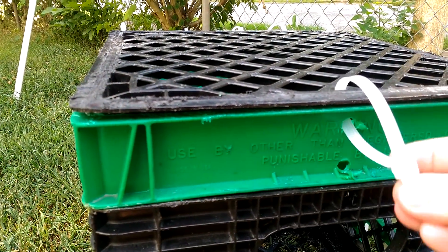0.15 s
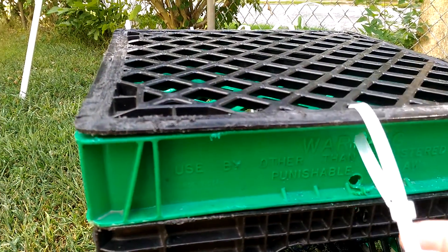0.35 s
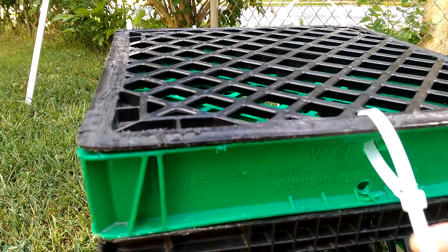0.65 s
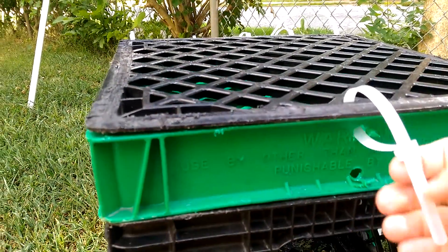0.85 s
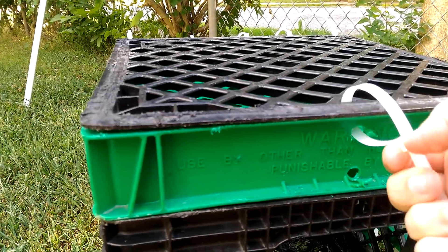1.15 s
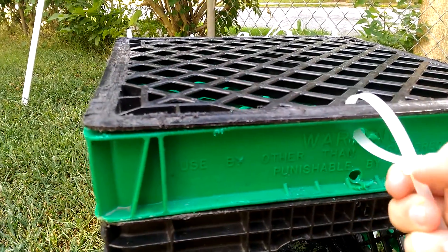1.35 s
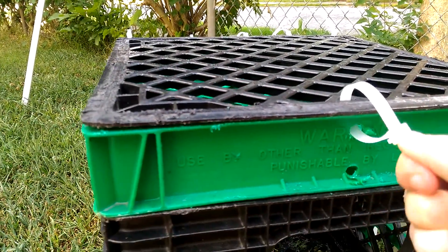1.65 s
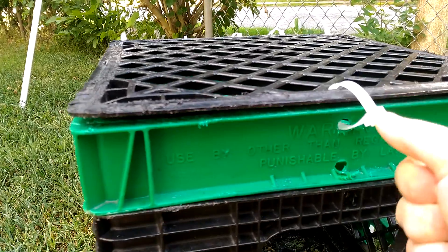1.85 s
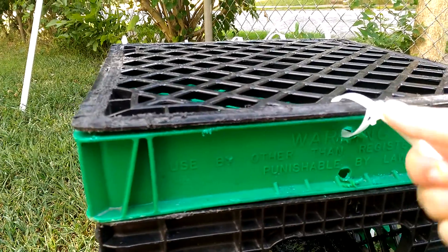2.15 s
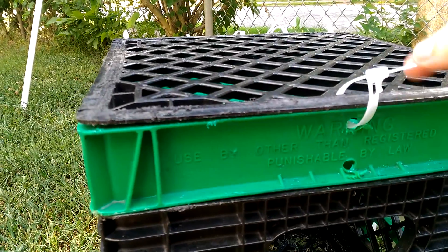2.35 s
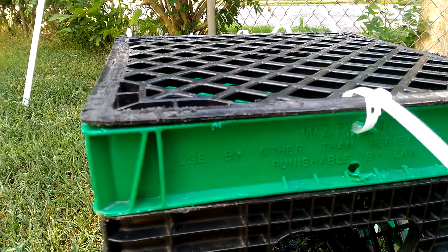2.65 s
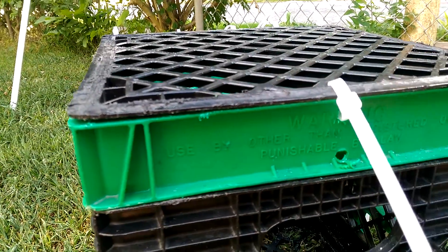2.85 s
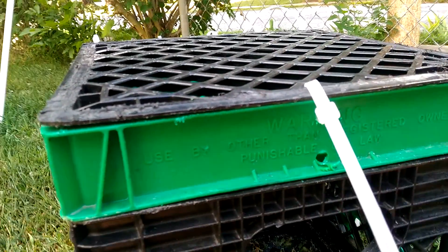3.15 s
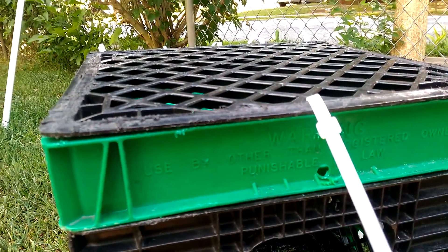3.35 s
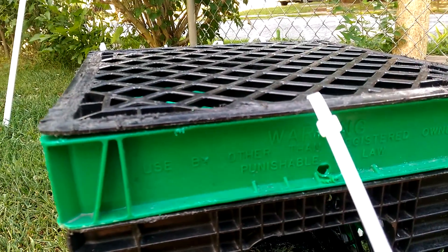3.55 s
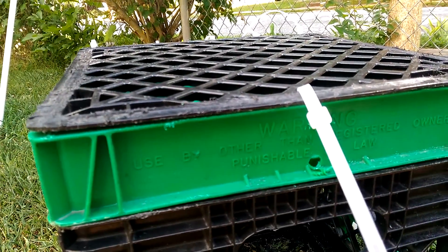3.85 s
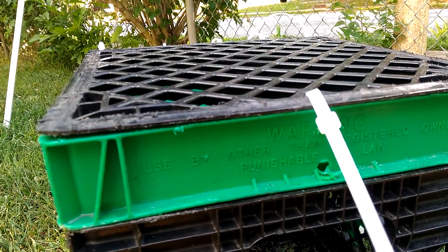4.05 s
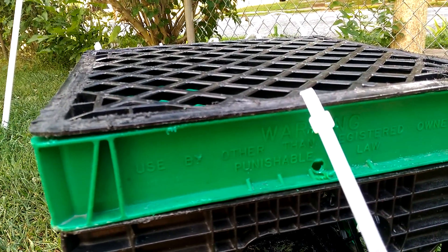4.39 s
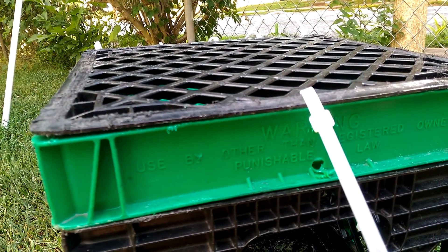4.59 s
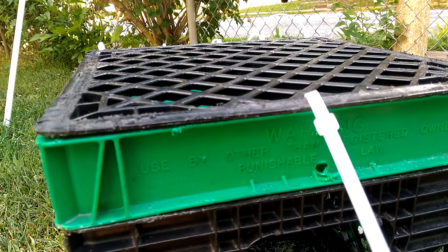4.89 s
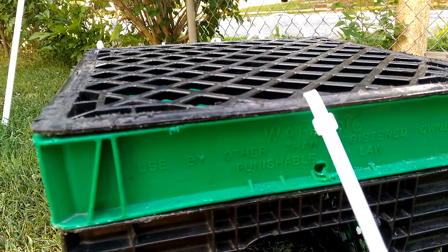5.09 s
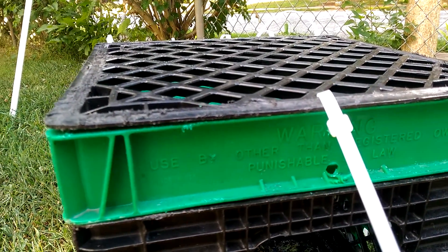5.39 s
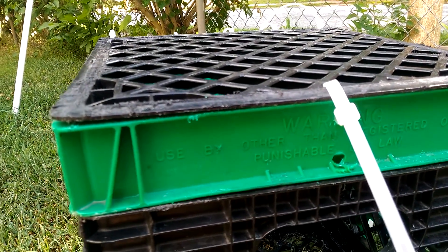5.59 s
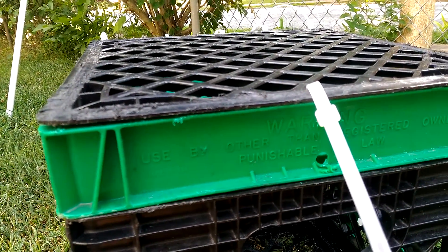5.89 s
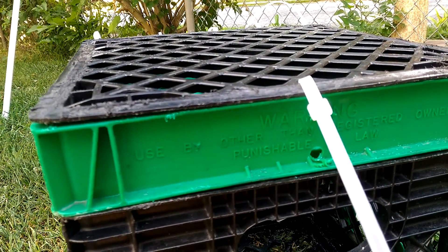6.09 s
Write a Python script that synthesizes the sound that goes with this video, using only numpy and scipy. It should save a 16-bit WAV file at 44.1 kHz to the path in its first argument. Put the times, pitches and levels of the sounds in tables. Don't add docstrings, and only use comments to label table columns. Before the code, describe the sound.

Crisp nylon ratchet clicks close by, a quick burst then a longer, louder zip, followed by faint handling taps, thin bird whistles and distant hum.

```python
import sys
import numpy as np
from scipy import signal
from scipy.fft import rfft, irfft, next_fast_len
from scipy.io import wavfile
from scipy.ndimage import uniform_filter1d, minimum_filter1d

SR = 44100
rng = np.random.default_rng(int(sys.argv[2]) if len(sys.argv) > 2 else 0)


def put_to_file(sound):
    columns = np.atleast_2d(sound).T
    safe = np.clip(columns, -1, 1)
    whole_steps = np.round(safe * 32767)
    wavfile.write(sys.argv[1], SR, whole_steps.astype(np.int16))


def volts_from_decibels(level):
    exponent = np.asarray(level, float) / 20
    return 10 ** exponent


N = 274743

# (frequency [Hz], width [Hz], level [dB])
CRATE_WALLS = [(314, 87, -1.5), (607, 60, -0.5), (710, 77, 1), (910, 74, -6.5), (1166, 180, -1.5),
               (1450, 125, -3), (1940, 160, -6.5), (2500, 250, -12), (3180, 220, -7)]


def level(x, db):
    return x * volts_from_decibels(db) / np.sqrt(np.mean(x ** 2))


def along(table, hz):
    f, v = np.transpose(table)
    return np.interp(np.log(hz + 1), np.log(f), v)


def ring(x, modes, detune=1):
    size = next_fast_len(x.shape[-1])
    f = np.fft.rfftfreq(size, 1 / SR) + 1
    power = 0
    for hz, width_hz, db in modes:
        off_tune = f / (hz * detune) - hz * detune / f
        power = power + volts_from_decibels(2 * db) / (1 + (hz / width_hz * off_tune) ** 2)
    cepstrum = irfft(np.log(power), size)
    cepstrum[1:size // 2] *= 2
    cepstrum[size // 2 + 1:] = 0
    return irfft(rfft(x, size) * np.exp(rfft(cepstrum)), size)[..., :x.shape[-1]]


def walk(rate_hz):
    hold = int(SR / rate_hz)
    steps = np.repeat(rng.standard_normal(N // hold + 1), hold)
    return 1.5 * uniform_filter1d(uniform_filter1d(steps, hold), hold)[:N]


def garden():
    # (frequency [Hz], density [dB per Hz])
    spectrum = [(15, -48), (25, -22.5), (108, -5.5), (249, -2.5), (354, -11.5), (463, -16), (796, -18.5),
                (1020, -19.5), (1500, -22), (2000, -19), (2610, -25), (3920, -26), (4370, -31),
                (6210, -26.5), (12500, -44), (16000, -44)]
    # (frequency [Hz], left minus right [dB])
    port_balance = [(60, 7.5), (700, 9), (2400, 10), (6000, 10.5), (8100, 2.5), (15000, 3.5)]
    # (frequency [Hz], likeness [0-1])
    likeness = [(60, 1), (350, 0.74), (600, 0.32), (1000, 0), (16000, 0)]
    # (frequency [Hz], width [Hz], level [dB])
    fan_lines = [(57.5, 4.4, -64), (115.94, 13.2, -61.5), (174.1, 4.9, -66.5), (242.7, 12, -72.5),
                 (353.5, 10.2, -68.5), (802, 9, -80), (851, 11.5, -82)]
    size = next_fast_len(N)
    f = np.fft.rfftfreq(size, 1 / SR)
    common, own = rfft(rng.standard_normal((2, size)))
    alike = np.clip(along(likeness, f), 0, 1)
    ports = volts_from_decibels(along(port_balance, f) / 2)
    right = alike * common + np.sqrt(1 - alike ** 2) * own
    pair = np.array([common * ports, right / ports])
    air, swell = 0, walk(2)
    for hz in 31 * 2. ** np.arange(10):
        octave = np.clip(1 - np.abs(np.log2((f + 1) / hz)), 0, 1) ** .5
        band = irfft(pair * octave * volts_from_decibels(along(spectrum, f)), size)[:, :N]
        air = air + band * volts_from_decibels(.5 * swell + .8 * walk(6))
    hum = 0
    for hz, width_hz, db in fan_lines:
        line = ring(rng.standard_normal(size), [(hz, width_hz, 0)])[:N]
        hum = hum + level(line, db)
    return level(air, -56.5) + hum * volts_from_decibels(np.array([[3], [-4]]))


def birds():
    # (time [s], length [s], start [Hz], crest [Hz], level [dB])
    whistles = [(0.582, 0.084, 7000, 7400, -64), (0.692, 0.07, 6270, 6750, -50.5),
                (0.795, 0.049, 5940, 6610, -49.5), (0.88, 0.056, 5050, 6180, -50.5),
                (0.986, 0.029, 4950, 5290, -54.5), (1.097, 0.033, 4930, 5660, -54),
                (2.532, 0.077, 7100, 7650, -69), (2.645, 0.06, 6200, 7300, -63),
                (2.738, 0.064, 5800, 7100, -61), (2.824, 0.091, 6000, 7100, -63),
                (2.921, 0.063, 6000, 7000, -59), (3.024, 0.091, 5850, 6950, -67),
                (3.847, 0.046, 7700, 7600, -67), (3.88, 0.041, 7800, 7000, -62.5),
                (3.968, 0.069, 6050, 6470, -54), (4.012, 0.032, 6110, 6480, -56),
                (4.413, 0.034, 6800, 6640, -66), (5.406, 0.052, 7430, 7660, -66),
                (5.445, 0.055, 7570, 7000, -59), (5.523, 0.051, 6350, 6780, -54),
                (5.56, 0.018, 6300, 6740, -73), (5.638, 0.059, 6400, 6710, -54.5)]
    # (delay [s], level [dB])
    reflections = [
        (0.018, -12),
        (0.046, -7),
        (.088, -12),
        (.13, -20),
    ]
    song, quaver = np.zeros(N), .007 * walk(250)
    for s, length_s, start_hz, crest_hz, db in whistles:
        u = np.arange(int(length_s * SR)) / (length_s * SR)
        span = slice(int(s * SR), int(s * SR) + len(u))
        hook = np.where(u < .4, (1 - u / .4) ** 2, .6 * (u - .4) ** 2)
        hz = (crest_hz + (start_hz - crest_hz) * hook) * (1 + quaver[span])
        shape = np.minimum(u / .3, 1) ** .6 * (1 - u) ** .7
        song[span] += volts_from_decibels(db) * shape * np.sin(2 * np.pi * np.cumsum(hz) / SR)
    t = np.arange(SR // 2) / SR
    mirror = volts_from_decibels(-35 - 60 * t / .5)
    for late_s, db in reflections:
        mirror = mirror + volts_from_decibels(db - 27) * np.exp(-((t - late_s) / .004) ** 2)
    echoes = signal.fftconvolve(song[None], mirror * rng.standard_normal((2, len(t))), axes=1)[:, :N]
    heard = song * volts_from_decibels(3.5 * walk(150)) + echoes * volts_from_decibels(5 * walk(170))
    return heard * volts_from_decibels(np.array([[3], [-4.5]]))


def thuds(size=4096):
    # (time [s], peak [dB])
    bumps = [
        (1.222, -54),
        (2.654, -47),
    ]
    out, t = np.zeros(N), np.arange(size) / SR
    for s, peak_db in bumps:
        bump = ring(rng.standard_normal(size) * np.exp(-t / 0.0088), CRATE_WALLS[2:6])
        out[int(s * SR):int(s * SR) + size] += bump * volts_from_decibels(peak_db) / np.abs(bump).max()
    return out * volts_from_decibels(np.array([[3], [-4.5]]))


def creep():
    # (time [s], level [dB], rise [s], fall [s], dull part [dB])
    shifts = [(.3, -91, 0.18, 0.11, -5), (.7, -60.5, 0.25, 0.044, -12), (.88, -61, 0.094, 0.039, -8),
              (.98, -63, 0.043, 0.059, -8), (1.25, -73, 0.14, 0.051, -12), (2.1, -60, 0.17, 0.069, -15),
              (2.62, -66.5, 0.041, 0.086, -4.5), (3.424, -63, 0.0058, 0.12, -8),
              (3.78, -60.5, 0.046, 0.1, -6), (4.17, -62, 0.14, 0.15, -7), (4.33, -66.5, 0.18, 0.86, -19),
              (4.76, -65, 0.15, 0.017, -13), (5.2, -68.5, 0.062, 0.088, -17), (5.45, -62.5, 0.11, 0.22, -3),
              (5.68, -60, 0.03, 0.073, -2), (6.0, -63, 0.024, 0.044, 0.5), (6.22, -64.5, 0.21, .1, -4)]
    grains = (rng.random(N) < 500 / SR) * volts_from_decibels(2.1 * rng.standard_normal(N))
    grains = 1.1 + signal.lfilter([1], [1, -np.exp(-1 / (0.0056 * SR))], grains)
    skin = grains * rng.standard_normal((2, N))
    bright = level(ring(skin, [(5730, 1240, 6.0), (7000, 2200, 9.0), (8900, 1700, 1.0), (12600, 880, -15)]), 1.0)
    dull = level(ring(skin, [(2300, 850, -0.21), (3120, 1300, -0.79)]), 0)
    t, press, drag = np.arange(N) / SR, 0, 0
    for s, db, rise_s, fall_s, dull_db in shifts:
        power = volts_from_decibels(2 * db) * np.exp(-2 * np.where(t < s, (s - t) / rise_s, (t - s) / fall_s))
        press = press + power
        drag = drag + power * volts_from_decibels(2 * dull_db)
    return (bright * np.sqrt(press) + dull * np.sqrt(drag)) * volts_from_decibels(np.array([[2.5], [-3]]))


def clicks(rows, bright, dull, edge, blow_db, snap_s, rattle_db, rattle_s, own_width_hz, boom_db=-4, size=2048):
    lead_s = .003
    out, t = np.zeros((2, N + size)), np.arange(size) / SR - lead_s
    after = np.maximum(t, 0)
    onset = np.clip(t / (3 * snap_s), 0, 1)
    slip = volts_from_decibels(-12.0) * np.exp(np.minimum(t, 0) / 0.00084) * (t < 3 * snap_s)
    snap = np.exp(-((t - 3 * snap_s) / snap_s) ** 2)
    blow = volts_from_decibels(blow_db) * (np.arange(size) == int((lead_s + 3 * snap_s) * SR))
    rattle = volts_from_decibels(rattle_db) * np.exp(-(after / rattle_s) ** 1.02) * onset
    boom = volts_from_decibels(rattle_db + boom_db) * np.exp(-after / (1.55 * rattle_s)) * onset
    brief = np.exp(-after / .0035)
    brisk = np.exp(-after / 0.0085)
    low = [mode for mode in bright if mode[0] < 7000]
    high = [mode for mode in bright if mode[0] >= 7000]
    for s, peak_db, dull_db, edge_db, pan_db, own_hz in rows:
        left, right, knock = rng.standard_normal((3, size))
        near = left * (slip + snap + rattle) + blow
        far = right * (slip + .5 * snap + 2 * rattle)
        shake = np.array([near, far])
        scrape = (shake - blow * [[1], [0]]) * brief
        detune = 1 + .025 * rng.standard_normal()
        own_ring = ring(shake * brisk, low + [(own_hz, own_width_hz, 0)])
        shudder = ring(shake * (1 - brisk), low + [(0.79 * own_hz, 1900, 0.5)])
        shudder = volts_from_decibels(-6.5) * ring(shudder, [(4200, 28000, 0)])
        head = own_ring + shudder + ring(scrape, high)
        rim = ring(scrape, edge, detune)
        body = ring(knock * (snap + boom) + blow + .18 * shake, dull, detune)
        click = 0
        for part, db, lean in ((head, 0, 1.1), (rim, edge_db, .12), (body, dull_db, .9)):
            ports = volts_from_decibels(lean * np.array([[pan_db], [-pan_db]]) / 2)
            part = part / np.abs(part).max(axis=1, keepdims=True)
            click = click + part * ports / ports.mean() * volts_from_decibels(peak_db + db)
        i = int((s - lead_s) * SR)
        out[:, i:i + size] += click
    return out[:, :N]


def fingers():
    # (time [s], peak [dB])
    faint = [(1.222, -55), (2.2748, -50), (2.652, -54), (3.4096, -54), (3.8647, -45), (4.028, -48),
             (4.19, -50), (4.2168, -49), (4.2914, -45.5), (4.3044, -45), (4.324, -44.5), (4.3437, -43.5),
             (4.368, -46.5), (4.4054, -43), (4.6553, -45.5), (4.6773, -44), (4.7196, -46), (4.737, -45),
             (5.059, -55.5), (5.154, -51), (5.306, -53), (5.359, -46), (5.5907, -45), (5.615, -44),
             (5.72, -44), (5.822, -44), (5.984, -45), (6.053, -45), (6.2074, -40.5)]
    # (time [s], peak [dB], dull part [dB], top edge [dB], own ring [Hz])
    firm = [(1.26, -42.5, -9, -36, 5900), (2.243, -41.5, -17, -47, 5200), (2.776, -48, -6, -40, 5600),
            (4.034, -50, -8, -40, 4370), (5.991, -52, -20, -30, 3000), (3.7538, -27.5, -15, 0, 6200),
            (3.7877, -37.5, -15, -20, 5900), (4.1428, -25.5, -14, -10, 6300), (4.2665, -44, -25, -1, 6300),
            (5.633, -35, -27, 1.5, 6650), (5.682, -34, -38, -29, 6480), (5.686, -34.5, -28, -26, 6550),
            (5.942, -49, -21, -25, 3540), (6.029, -51, -17, -23, 3030), (6.1832, -35, -32, -3, 3330),
            (6.1871, -30.5, -35, -2.5, 6060)]
    # (time [s], peak [dB], dull part [dB], top edge [dB], left minus right [dB], own ring [Hz])
    knuckle = [
        (4.2703, -61.5, 28, -25, 15, 2600),
    ]
    # (time [s], left minus right [dB])
    hand_pan = [(1.2, 21), (4.4, 8), (5.4, 26), (5.6, 2), (6.23, 11)]
    # (frequency [Hz], width [Hz], level [dB])
    tick_bright = [(3500, 1700, -2), (5300, 240, -12), (6460, 840, 3.5), (8800, 1800, -0.5)]
    tick_dull = [(820, 380, -14), (1380, 760, -8), (1990, 180, 12), (2640, 320, -36.5)]
    shell_edge = [(7820, 1600, 5), (11700, 3500, -5)]
    tap_bright = [(3380, 890, -10.5), (8950, 730, -9)]
    tap_dull = [(900, 400, -13), (1450, 600, -4), (1950, 430, 1)]
    knuckle_dull = [(850, 540, 1), (1400, 660, 1.5), (2070, 500, -3.5)]

    def pan(s):
        return np.interp(s, *np.transpose(hand_pan))

    s, db = np.transpose(faint)
    own_hz = 6900 * (1 + 0.028 * rng.standard_normal(len(s)))
    chance = rng.standard_normal((3, len(s)))
    knock_db = -33 - .9 * (db - db.max()) - chance[0]
    ticks = np.transpose([s, db, knock_db, -11 + 3 * chance[1], pan(s) + 3 * chance[2], own_hz])
    taps = [(s, db, dull_db, edge_db, pan(s), hz) for s, db, dull_db, edge_db, hz in firm]
    hand = clicks(ticks, tick_bright, tick_dull, shell_edge, blow_db=9, snap_s=0.000425,
                  rattle_db=-7.0, rattle_s=0.0067, own_width_hz=800)
    hand += clicks(taps, tap_bright, tap_dull, shell_edge, blow_db=17.0, snap_s=0.00023,
                   rattle_db=-1.0, rattle_s=0.0061, own_width_hz=1900)
    hand += clicks(knuckle, tap_bright, knuckle_dull, shell_edge, blow_db=18, snap_s=0.0003,
                   rattle_db=-3, rattle_s=0.0025, own_width_hz=900)
    return hand


def rasp(rows, rub_db, smear_s):
    rim_modes = [(360, 110, -12), (665, 610, 1), (1410, 3000, 2.5), (2600, 900, 0.5), (4400, 400, 5.5)]
    t = np.arange(N) / SR
    pull = sum(volts_from_decibels(db) * np.exp(-((t - s - smear_s / 2) / smear_s) ** 2) for s, db, *_ in rows)
    common, left, right = rng.standard_normal((3, next_fast_len(N)))
    friction = np.array([common + .5 * left, common + .5 * right])
    rub = level(ring(friction, rim_modes)[:, :N], rub_db)
    rub = signal.sosfilt(signal.butter(6, 4600, fs=SR, output="sos"), rub)
    return rub * pull * volts_from_decibels(1.1 * walk(300)) * volts_from_decibels(np.array([[3.5], [-5]]))


def teeth(rows, pan_db):
    s, db, hz, knock_db, edge_db = np.transpose(rows)
    return np.transpose([s, db, knock_db, edge_db, pan_db + 1.5 * rng.standard_normal(len(s)), hz])


def zip_tie():
    # (time [s], peak [dB], own ring [Hz], crate knock [dB], top edge [dB])
    nudge = [
        (.0998, -37, 5860, -15.5, -14),
        (.1188, -38, 5600, -13, -11),
        (.1222, -35.5, 6300, -15, -16),
        (.142, -48.5, 5100, -1, -16),
        (.159, -54, 5500, -13, -20),
        (.3411, -41, 6600, -1, -25),
    ]
    loose = [(.3635, -20, 5600, -10.5, -12), (.3688, -23, 5600, -14.5, -8), (.3778, -20.5, 5700, -12.5, -9),
             (.3838, -19, 6260, -17, -13), (.3912, -23, 4960, -12.5, -8), (.3963, -23, 5030, -22, -20),
             (.4028, -20, 4530, -23, -9.5), (.4095, -32, 4080, -12.5, -26), (.4852, -18, 5800, -13, -6),
             (.4912, -21.5, 6170, -12.5, -13), (.4975, -23.5, 6700, -11.5, -14),
             (.5012, -19, 5600, -17, -17), (.5054, -21.5, 5650, -33, -9), (.5090, -30, 6460, -19, -8),
             (.5115, -22.5, 5300, -10, -9), (.5140, -19.5, 5600, -10, -9), (.5165, -19, 5400, -11.5, -11),
             (.5200, -25, 5200, -7.5, -5), (.5228, -21.5, 4960, -12, -10), (.5252, -31, 5600, -22, -25)]
    jerk = [
        (.6572, -22.5, 5600, -3.5, -10),
        (.6603, -23.5, 5600, -8, -16),
        (.6632, -29, 4000, -29, -22),
        (.6708, -23.5, 4100, -10.5, -14),
    ]
    draw = [(1.6861, -36, 5300, -1, -3), (1.704, -29, 5200, -5, -4.5), (1.717, -25, 4960, -10.5, -11),
            (1.728, -22.5, 4850, -10, -16), (1.738, -22, 5160, -8.5, -27), (1.7498, -16.5, 5360, -17.5, -8),
            (1.7643, -18.5, 5600, -14, -18), (1.7863, -19, 5530, -11, -12), (1.8056, -19.5, 5340, -16, -16),
            (1.8188, -19.5, 5400, -15, -12), (1.8287, -21, 5550, -15, -4.5), (1.8372, -25, 4950, -15, -5),
            (1.8412, -31, 6000, -4, -10), (1.8457, -21, 5400, -5, -10), (1.8505, -25, 5600, -9, -10),
            (1.857, -24, 6250, -9.5, -15), (1.8714, -18.5, 5500, -9, -20), (1.891, -17, 5600, -10.5, -18)]
    tight = [(1.914, -20, 5360, -13, -22), (1.935, -18.5, 5600, -15, -14), (1.947, -17.5, 5540, -18, -14),
             (1.9588, -19, 5000, -23, -6.5), (1.9691, -18.5, 5900, -14, -10),
             (1.9785, -17, 4940, -6.5, -15), (1.9907, -18, 5130, -7, -7.5),
             (2.0046, -18.5, 5070, -6.5, -18), (2.0219, -13.5, 6300, -10.5, -13),
             (2.0426, -11, 6120, -17, -13), (2.082, -11, 6220, -16.5, -18)]
    # (frequency [Hz], width [Hz], level [dB])
    nudge_head = [(5600, 510, 0.5), (8300, 1500, -3.5)]
    loose_head = [(3820, 3500, -7), (5200, 990, -27), (5550, 280, -6), (7220, 480, -0.5), (8030, 1400, -7)]
    tight_head = [(4300, 1220, -36), (5180, 1100, -6), (6120, 650, -7), (7400, 630, -3.5), (9860, 870, -12)]
    jerk_crate = [(340, 90, -8), (680, 130, 0.5), (820, 150, -5), (1200, 250, -10), (2050, 300, -11),
                  (2820, 400, -13), (3500, 500, -9)]
    draw_crate = [(400, 160, -11), (714, 73, 0.5), (1260, 200, 1.5), (1920, 700, -1), (2600, 530, 3),
                  (3150, 300, -4), (4230, 180, 3.5)]
    tight_crate = [(276, 76, -2), (649, 86, -0.5), (956, 200, -5), (1270, 470, -1.5), (1800, 160, -2.5),
                   (2500, 490, -5.5), (3250, 220, -6)]
    loose_edge = [(11400, 1400, -0.55), (12800, 1300, -0.45)]
    jerk_edge = [(8900, 950, 0.5), (11400, 780, -0.5)]
    tight_edge = [(8900, 1400, 4), (11060, 1060, -1), (14900, 1500, -8)]
    tie = clicks(teeth(nudge, pan_db=11), nudge_head, CRATE_WALLS, loose_edge, blow_db=16, snap_s=0.00059,
                 rattle_db=2.0, rattle_s=0.0067, own_width_hz=700)
    tie += clicks(teeth(loose, pan_db=9), loose_head, CRATE_WALLS, loose_edge, blow_db=-5, snap_s=0.000292,
                  rattle_db=0.0, rattle_s=0.0057, own_width_hz=620, boom_db=-8.5)
    tie += clicks(teeth(jerk, pan_db=9), loose_head, jerk_crate, jerk_edge, blow_db=13.5, snap_s=0.000366,
                  rattle_db=2.5, rattle_s=0.006, own_width_hz=460, boom_db=-11.5)
    tie += clicks(teeth(draw, pan_db=12), tight_head, draw_crate, tight_edge, blow_db=19, snap_s=0.0005,
                  rattle_db=-2.5, rattle_s=0.0048, own_width_hz=1400, boom_db=0)
    tie += clicks(teeth(tight, pan_db=12), tight_head, tight_crate, tight_edge, blow_db=15.0, snap_s=0.0004067,
                  rattle_db=1.0, rattle_s=0.0042, own_width_hz=1200, boom_db=-1.0)
    return tie + rasp(draw + tight[:-2], rub_db=-30.5, smear_s=0.006)


def scene():
    background = garden() + birds()
    hand = thuds() + creep() + fingers()
    return background + hand + zip_tie()


def starve(x):
    treble_cut = signal.butter(6, 7500, "highpass", fs=SR, output="sos")
    treble = signal.sosfiltfilt(treble_cut, x)
    bright = np.abs(signal.sosfilt(signal.butter(2, 3000, "highpass", fs=SR, output="sos"), x))
    reach = int(.03 * SR)
    loudest = -minimum_filter1d(-bright, reach, origin=reach // 3)
    power = uniform_filter1d(treble ** 2, size=128) ** 2
    floor = volts_from_decibels(-41) * loudest + 1e-9
    return x - treble / (1 + power / floor ** 4)


def band_limit(x):
    return signal.sosfilt(signal.butter(12, 16460, fs=SR, output="sos"), x)


def record(dry):
    bass_cut = signal.butter(6, 45, "highpass", fs=SR, output="sos")
    top_cut = signal.butter(8, 13900, fs=SR, output="sos")
    mix = starve(signal.sosfilt(np.vstack([bass_cut, top_cut]), dry))
    return band_limit(mix)


dry = scene()
out = record(dry)
put_to_file(out)
```